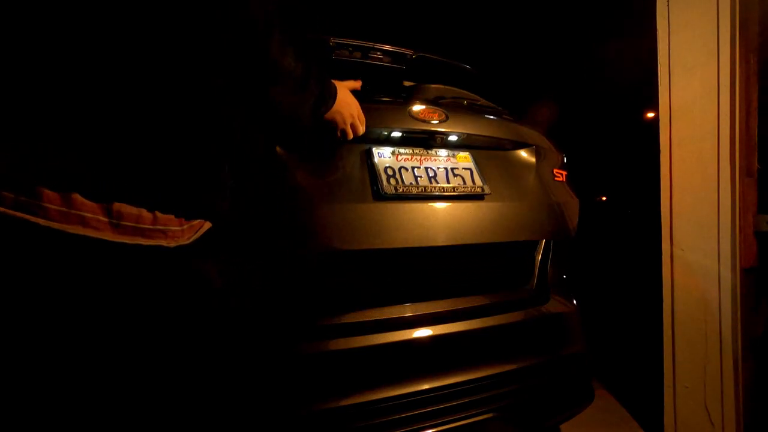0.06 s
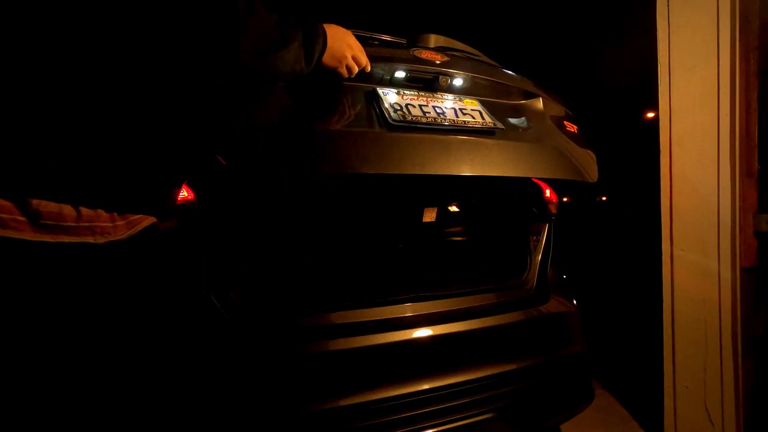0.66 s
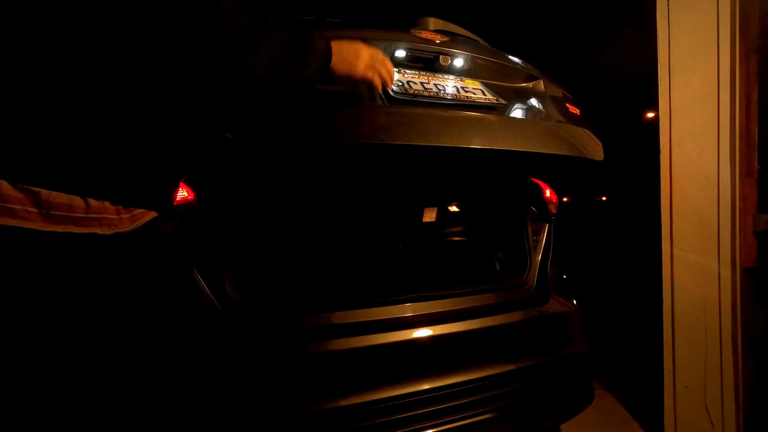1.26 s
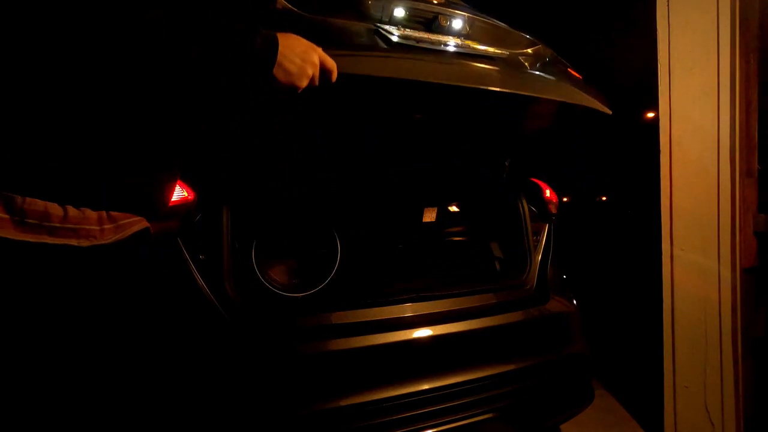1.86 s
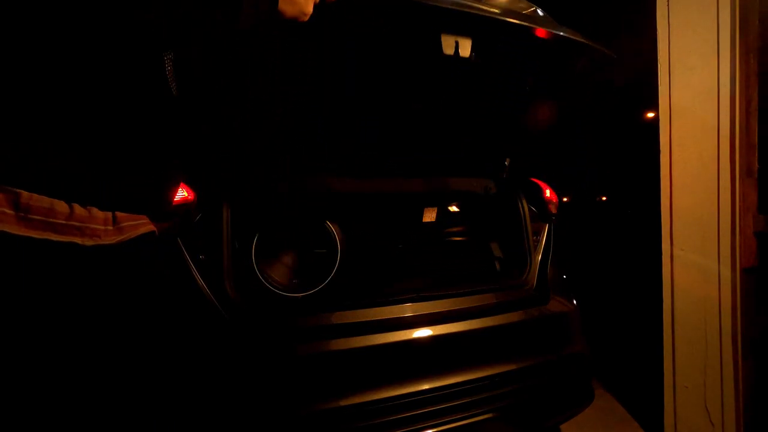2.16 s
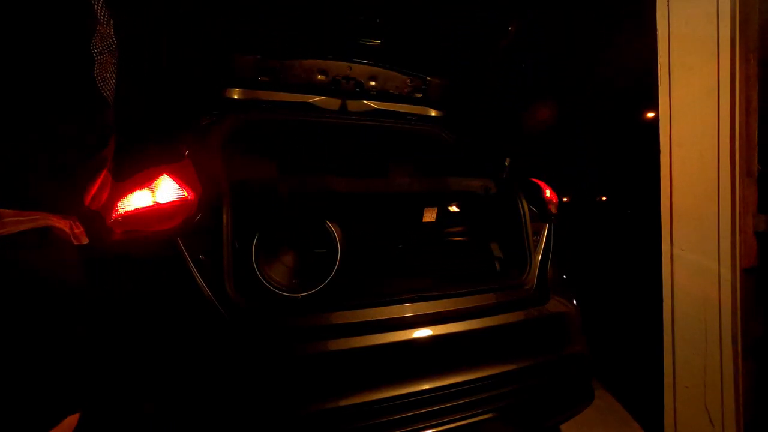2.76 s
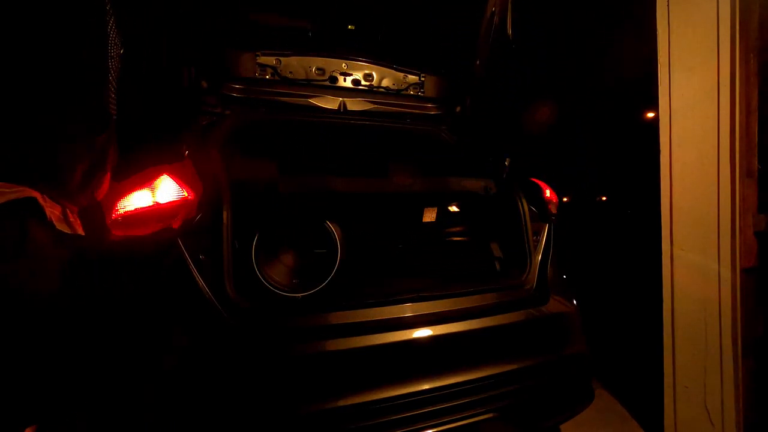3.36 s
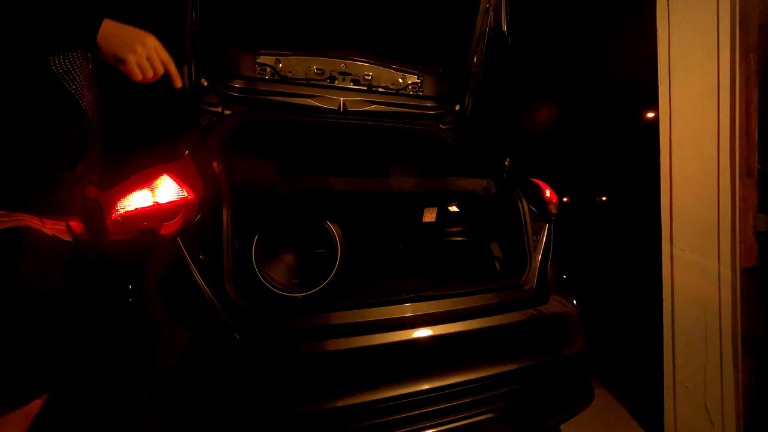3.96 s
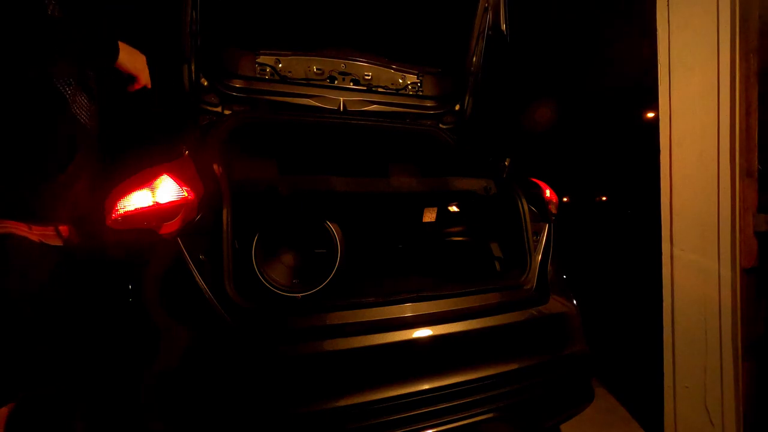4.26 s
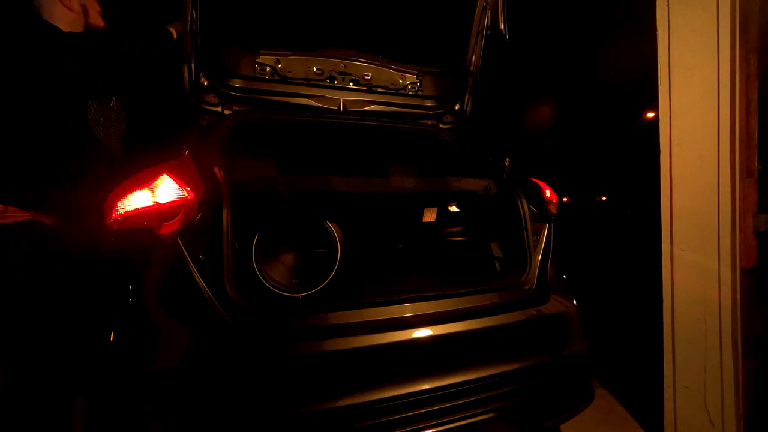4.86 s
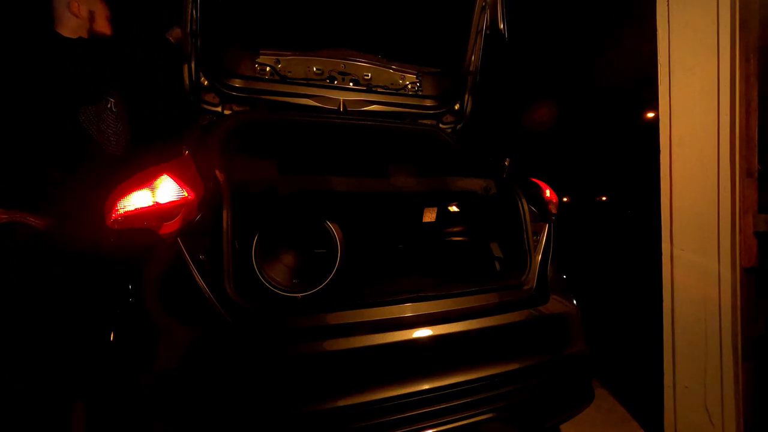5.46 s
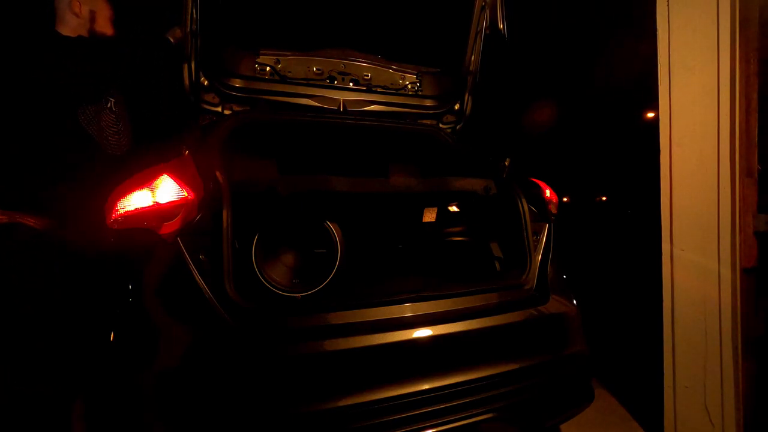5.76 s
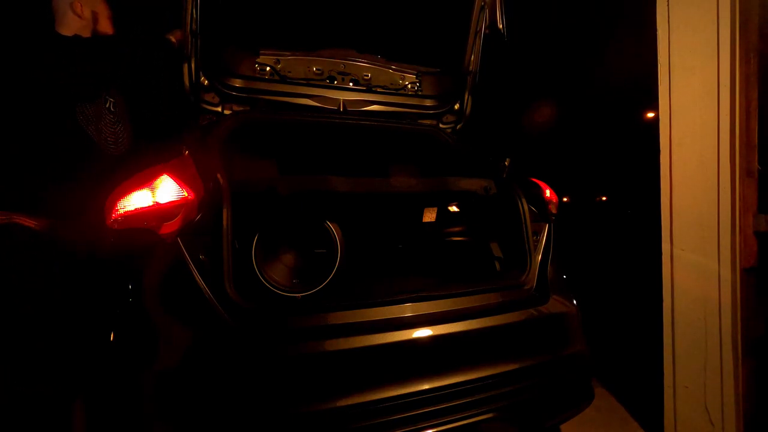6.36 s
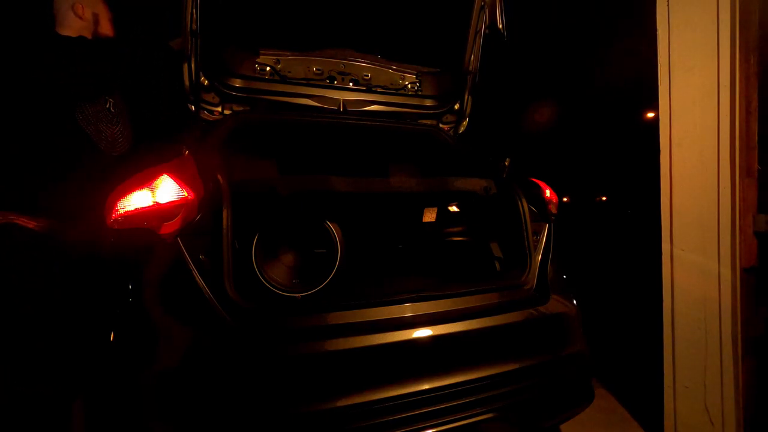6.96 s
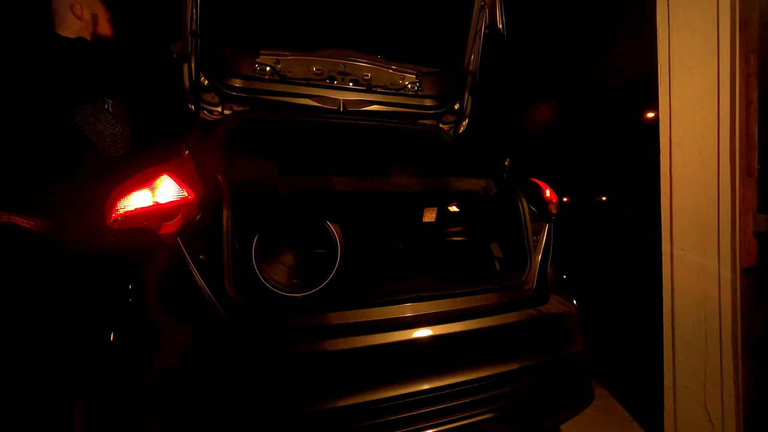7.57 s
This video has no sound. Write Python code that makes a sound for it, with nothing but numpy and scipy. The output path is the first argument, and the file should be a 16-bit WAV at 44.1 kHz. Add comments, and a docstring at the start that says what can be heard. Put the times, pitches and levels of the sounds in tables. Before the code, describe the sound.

Low wind rumble, a dull hum and soft street noise surround a mono microphone just behind a parked car. Light knocks ring the panels as the rear hatch opens and rises with a gentle hiss, a sinking whine and a short groan. Cloth brushes the trim and a heel taps twice. Near the end come two louder bursts of clattering, each with a deep thump from the car body.

```python
"""Low wind on the microphone, a dull drone and the wash of a street at night, all in mono.
Close by, someone unlatches a car's rear hatch and lifts it: gas hisses through the struts' valves
and rings a lengthening chamber, so its whine falls. Knocks ring the panels, trim bumps and squeaks,
a jacket sleeve swishes over it, a heel taps twice and the hatch groans near the top.
Two heavier clatters follow, the car body booming under them."""
import sys
import numpy as np
from scipy import signal
from scipy.fft import rfft, irfft
from scipy.io import wavfile
from scipy.ndimage import uniform_filter1d

SR = 44100
rng = np.random.default_rng(int(sys.argv[2]) if len(sys.argv) > 2 else 0)


def store_wav(level_fs):
    """Save 16-bit WAV to argv[1]."""
    pcm = np.round(np.clip(np.atleast_2d(level_fs), -1, 1) * 32767)
    wavfile.write(sys.argv[1], SR, pcm.T.astype(np.int16))


N = 339878
TIME = np.arange(N) / SR

# spectrum of the street behind the car: f/Hz, level/dB
STREET_COLOUR = [(80, -18), (140, -2), (177, -6), (260, -12), (340, -9), (490, -12.5), (580, -18),
                 (720, -13.5), (1050, -17), (1500, -20.5), (3000, -32), (6470, -45), (8340, -57),
                 (15000, -100)]
# the street slowly quietens: t/s, level/dB
STREET_LEVEL = [(0, -40.5), (4.2, -40.5), (7.7, -43)]
# spectrum of the low rumble: f/Hz, level/dB
RUMBLE_COLOUR = [(15, -2.5), (28, -9), (41, 6.5), (55, 3), (80, -1), (130, -17.5), (220, -29), (500, -87)]
# early wind gusts, then the car body booming under the clatters: crest t/s, level/dB, half length/s
LOW_RUMBLE_SWELLS = [(.9, -37.5, 0.13), (1.42, -34.5, .1), (2.42, -34, 0.2), (5.62, -26, .07),
                     (6.68, -37, 0.12), (7.03, -27.5, 0.12)]
# swells of the drone: crest t/s, level/dB, half length/s
DRONE_CRESTS = [(4.0, -37.5, 0.27), (7.5, -41.5, 0.22)]

# gas through the strut's valve, a short first lift and then the long rise: t/s, level/dB
HISS_LEVEL = [(0, -64), (.25, -59), (.7, -69.5), (1.65, -70.5), (1.88, -54), (2.9, -54), (3.55, -56),
              (3.9, -60), (6.8, -60.5), (7.25, -67)]
# spectrum of that gas: f/Hz, level/dB
GAS_COLOUR = [(1000, 0), (2000, 0.5), (3300, 2), (5000, -3.5), (7700, -4), (8600, -2), (9600, -9),
              (11500, -23), (13100, -22), (15000, -29)]
# thin whistles of the valve as the flow slows: f/Hz, width/Hz, relative level/dB
VALVE_WHISTLES = [(8500, 190, 0.5), (12880, 160, -5), (13250, 160, -18), (13720, 110, -5)]
# rise and fall of those whistles: t/s, level/dB
WHISTLE_LEVEL = [(2.9, -115), (3.4, -67), (4.0, -73), (4.7, -83), (6.7, -86), (7.15, -110)]
# the gas chamber lengthens as the hatch rises: t/s, length/m
CHAMBER_LENGTH = [(0, 0.041), (.5, .060), (1.8, 0.098), (2.2, .111), (2.95, .171), (3.42, .215),
                  (3.68, 0.22), (4.4, 0.24)]
# first to fourth mode of the chamber: relative level/dB
CHAMBER_PARTIALS = [-2.5, -14, -24, -29]
# the chamber sings in swells: crest t/s, level/dB, half length/s
WHINE_SWELLS = [(.24, -61, 0.056), (.49, -62, 0.073), (2.36, -50.5, .08), (2.78, -49, 0.17),
                (3.52, -44, .1), (3.95, -43, 0.22)]
# the hatch groans near the top of its travel: crest t/s, level/dB, half length/s
GROAN_SWELLS = [(3.55, -42.5, 0.46), (3.63, -35, 0.082)]
# sinking pitch of the groan: t/s, f/Hz
GROAN_PITCH = [(3.0, 355), (3.48, 337.6), (3.72, 319.5)]

# knocks on panels and trim, and two short, dull heel taps (at 3.354 and 5.185 s):
# t/s, base level/dB, extra thud/dB, hardness/dB, base t60/s, low-pass f/Hz
KNOCKS_AND_TAPS = [(0.312, -35, -1, 3.5, .1, 3000), (0.609, -30.5, -12, 6.5, .14, 1640),
                   (0.661, -29.5, -13, -4, 0.45, 1480), (1.079, -35.5, -4, 5.5, 0.22, 2800),
                   (1.115, -33, 6, -8, .28, 3000), (1.448, -25, -1, 3.5, 0.092, 11700),
                   (1.459, -26.5, -1.5, -7, .45, 9000), (3.354, -21, -5, -3.5, 0.056, 1290),
                   (3.846, -33, 6.5, 1, 0.27, 6950), (4.285, -24.5, -15, 5.5, 0.15, 5100),
                   (4.300, -28, 9, -2, 0.27, 11060), (5.185, -27, -1.5, 1.5, .07, 3000),
                   (5.509, -21.5, -27, -2, 0.2, 2600), (5.546, -15, -5, 5, 0.13, 3130),
                   (5.571, -24.5, 0, 7.5, 0.3, 5900), (5.578, -8, -7.5, -8.5, 0.23, 3740),
                   (5.607, -21, 3.5, 7.5, 0.14, 5400), (5.632, -21, -3, 0, 0.27, 9400),
                   (6.498, -35, 1.5, -2.5, 1, 2000), (6.565, -19, -3, -3, 0.18, 2630),
                   (6.597, -29.5, 4, 8, 0.32, 2200), (6.648, -25, 3, -2.5, 0.34, 4020),
                   (6.834, -22.5, -4, -0.5, 0.62, 5400), (6.891, -15, -2, 4.5, .18, 3500),
                   (6.914, -21, 5, -5, 0.17, 3400), (6.987, -13, 1.5, 6, .24, 3400),
                   (7.011, -11, -1, -3, 0.22, 7960), (7.050, -16.5, 2.5, -5.5, 0.25, 5400),
                   (7.086, -22, 1, -7, 0.22, 2940)]
# spectrum of a struck panel: f/Hz, level/dB
PANEL_COLOUR = [(25, -31.5), (42, -7.5), (88, 5.5), (135, -9), (260, -11), (360, -5.5), (500, -8),
                (590, -20), (800, -13.5), (1140, -18.5), (3070, -31.5), (6000, -37.5), (9000, -46.5),
                (15000, -76)]
# modes of the panels: f/Hz, width/Hz
PANEL_RESONANCES = [(174, 17.4), (200, 22), (280, 68), (331, 30), (408, 18), (460, 13.4), (504, 15.4),
                    (736, 32), (985, 8.7), (1044, 27), (1110, 55), (1333, 36), (1525, 18), (1660, 28),
                    (1820, 16), (2300, 14), (2480, 8.3)]
# edges of a knock's four bands, thud, body, clack and tick: f/Hz
KNOCK_EDGES = [58, 180, 600, 2400, 15500]
# how an impact feeds each band: offset/dB, gain/dB per dB of hardness, t60 factor, rise/s
KNOCK_BANDS = [(-1, 0, 1.6, 0.0055), (-0.5, 0.5, 1.36, 0.0015), (-6.5, 1.0, 1.06, .0018),
               (-18.5, 1.51, 0.88, 0.00084)]
# bumps and squeaks of rubber and trim: crest t/s, level/dB, f/Hz, half length/s, glide/Hz per s
TRIM_BUMPS = [(0.663, -15, 398.6, 0.0061, -3000), (1.482, -15.5, 94.7, 0.023, -500),
              (5.493, -18.5, 113.3, 0.011, -300), (5.948, -55, 2970, 0.033, -500),
              (6.464, -53, 4490, 0.018, 2406), (6.693, -23.5, 42.18, 0.058, -40.5)]
# brushes of cloth: crest t/s, level/dB, half length/s, lowest f/Hz, relative fizz/dB, fizz lag/s
SLEEVE_STROKES = [(1.368, -55, 0.0056, 3000, -2, 0), (1.468, -54, 0.026, 2940, -7.5, 0),
                  (1.696, -53, .018, 1200, -21, 0), (1.859, -36.5, 0.017, 1610, -13, -.01),
                  (2.076, -32, 0.029, 620, -16.5, .024), (2.934, -36.5, 0.019, 1860, -16, 0),
                  (4.089, -34.5, .012, 1620, -11.5, -.01), (5.21, -44, 0.016, 2120, -15, 0),
                  (6.087, -67, .011, 4000, 5, -0.0083)]
# spectrum of cloth on trim: f/Hz, level/dB
FRICTION_COLOUR = [(500, 10), (1500, -6.5), (3000, -8.5), (6000, -9), (10000, -14.5), (15000, -46)]
# hollows of the rubbed trim: f/Hz, width/Hz
TRIM_HOLLOWS = [(720, 87), (1620, 290), (2550, 140), (3250, 270)]


def amp(db):
    """Decibels to gain."""
    return 10 ** (np.asarray(db) / 20)


def unit(x):
    """Scales to rms 1."""
    return x / np.sqrt(np.mean(x ** 2) + 1e-20)


def curve(rows):
    """A table of times and values, read at every sample."""
    return np.interp(TIME, *np.transpose(rows))


def swells(rows):
    """Gain that rises and falls in a bell around each crest."""
    return sum(amp(db) * np.exp(-.5 * ((TIME - s) / half_length) ** 2) for s, db, half_length in rows)


def wander(rate_hz):
    """Smooth random drift of rms 1."""
    smoothing = np.exp(-(np.fft.rfftfreq(N, 1 / SR) / rate_hz) ** 2)
    return unit(irfft(rfft(rng.standard_normal(N)) * smoothing, N))


def grain(length, depth_db, lump_samples):
    """Gain that flutters in short random lumps."""
    return amp(depth_db * unit(uniform_filter1d(rng.standard_normal(length), lump_samples)))


def colour(x, points, modes=(), mode_lift=1.57):
    """Shapes x by a smooth spectrum, with resonances standing out of it; rms 1."""
    hz = np.fft.rfftfreq(len(x), 1 / SR)
    f, db = np.transpose(points)
    gain = amp(np.interp(np.log(hz + 1), np.log(f), db))
    peaks = sum(1 / (1 + (2 * (hz - centre) / width) ** 2) for centre, width in modes)
    return unit(irfft(rfft(x) * gain * (1 + mode_lift * peaks), len(x)))


def low_pass(x, edge_hz, order=4):
    """Causal low-pass."""
    return signal.sosfilt(signal.butter(order, min(edge_hz, .48 * SR), fs=SR, output="sos"), x)


def band(x, low_hz, high_hz, order=3):
    """Causal band-pass."""
    return signal.sosfilt(signal.butter(order, [low_hz, high_hz], "band", fs=SR, output="sos"), x)


def patchy(x, depth_db, frames=14, bins=6):
    """Turbulence: patches of the spectrum come and go; rms 1."""
    spectra = signal.stft(x, nperseg=1024, noverlap=768)[2]
    patches = uniform_filter1d(rng.standard_normal(spectra.shape), bins, axis=0)
    patches = unit(uniform_filter1d(patches, frames, axis=1))
    return unit(signal.istft(spectra * amp(depth_db * patches), nperseg=1024, noverlap=768)[1][:N])


def fuzzy_tone(hz, width_hz):
    """Noise ringing in a narrow resonance that follows hz."""
    pole = np.exp(-np.pi * width_hz / SR)
    noise = rng.standard_normal(N) + 1j * rng.standard_normal(N)
    flutter = signal.lfilter([1], [1, -2 * pole, pole * pole], noise)
    return unit((flutter * np.exp(2j * np.pi * np.cumsum(hz * np.ones(N)) / SR)).real)


def add(mix, s, sound):
    """Mixes a sound in at time s."""
    part = mix[max(round(s * SR), 0):][:len(sound)]
    part += sound[:len(part)]


def walls(x, t60, wet_db, echoes_per_s=2000):
    """Direct sound, then scattered echoes from the open boot and the house wall, from 7 ms on."""
    t = np.arange(SR // 2) / SR
    taps = rng.standard_normal(len(t)) * (rng.random(len(t)) < echoes_per_s / SR)
    taps *= (t > .007) * amp(-60 * t / t60)
    return x + amp(wet_db) * signal.fftconvolve(x, taps / np.linalg.norm(taps))[:N]


def low_rumble(lull_db=-40.5):
    """Wind on the microphone, gusting early on; later swells are the car body booming under clatters."""
    strength = (amp(lull_db) + swells(LOW_RUMBLE_SWELLS)) * amp(-.5 * wander(2))
    return strength * colour(rng.standard_normal(N), RUMBLE_COLOUR)


def drone(base_db=-37.5, hum_hz=99.9):
    """An unsteady low hum in the background, with a narrow band of noise just below it."""
    hum = np.sqrt(2) * np.sin(2 * np.pi * np.cumsum(hum_hz + 3.58 * wander(6.61)) / SR)
    return (amp(base_db) + swells(DRONE_CRESTS)) * (.42 * hum + .73 * fuzzy_tone(95, width_hz=26))


def street():
    """The dull, gently shifting wash of the street beyond the car."""
    wash = low_pass(colour(rng.standard_normal(N), STREET_COLOUR), 8600)
    return amp(curve(STREET_LEVEL) + .5 * wander(9.8)) * patchy(wash, depth_db=1.7)


def strut_hiss(jet_peak_db=-68, jet_db_per_db=2.7):
    """Gas rushes through the valve; the jet's bright spray grows faster than the hiss."""
    hiss_db = curve(HISS_LEVEL)
    jet_db = jet_peak_db + jet_db_per_db * (hiss_db - hiss_db.max())
    gas = patchy(colour(rng.standard_normal(N), GAS_COLOUR), depth_db=3.5, frames=12, bins=4)
    jet = patchy(band(rng.standard_normal(N), 8500, 14000, order=2), depth_db=3.5, frames=24, bins=4)
    return amp(hiss_db) * gas + amp(jet_db) * jet


def strut_whine(sound_m_per_s=343, width_hz=55):
    """The gas rings the strut's chamber; half a wave fits its length, so the pitch falls as it grows."""
    hz = sound_m_per_s / (2 * curve(CHAMBER_LENGTH))
    hz *= 1 + .0074 * wander(14)  # the rod slides unevenly
    chamber = sum(amp(db) * fuzzy_tone(k * hz, width_hz) for k, db in enumerate(CHAMBER_PARTIALS, 1))
    return swells(WHINE_SWELLS) * amp(2.4 * wander(8.9)) * low_pass(chamber, 3400, order=3)


def knocks_and_taps(contact_hz=860, hardness_db_per_octave=10.5):
    """Knocks ring the nearby panels, heel taps die at once; bass swells later and lasts longer."""
    out, t = np.zeros(N), np.arange(SR // 2) / SR
    for s, level_db, thud_db, hardness_db, t60, top_hz in KNOCKS_AND_TAPS:
        chatter = grain(len(t), depth_db=2.5, lump_samples=130)  # loose parts
        mode_hz = contact_hz * 2 ** (hardness_db / hardness_db_per_octave)  # harder rings higher
        modes = [*PANEL_RESONANCES, (mode_hz, .13 * mode_hz)]
        ringing = chatter * colour(rng.standard_normal(len(t)), PANEL_COLOUR, modes)
        for low, high, (band_db, tilt, linger, rise) in zip(KNOCK_EDGES, KNOCK_EDGES[1:], KNOCK_BANDS):
            db = level_db + band_db + tilt * hardness_db + thud_db * (low == KNOCK_EDGES[0])
            envelope = amp(-60 * t / (t60 * linger)) * (1 - np.exp(-t / rise))
            ring = low_pass(band(ringing * envelope, low, high), top_hz, order=6)
            add(out, s, amp(db) * np.sqrt(np.mean(envelope ** 2)) * unit(ring))
    return out


def bump(s, db, hz, half_length, glide):
    """A resonance of rubber or trim swells; its pitch slides with pressure, jitters as surfaces catch."""
    t = TIME - s
    pitch = (hz + glide * t) * (1 + .018 * wander(250))
    return swells([(s, db, half_length)]) * np.sin(2 * np.pi * np.cumsum(pitch) / SR)


def swishes(split_hz=5100, fizz_top_hz=13500, edge_cycles=88):
    """A sleeve slides over trim near the microphone: a grainy rub below, the fizz of fibres above."""
    out, t = np.zeros(N), np.arange(-SR // 5, SR // 5) / SR
    skew = np.where(t < 0, 1.18, .94)  # a stroke rises more slowly than it falls
    for s, db, half_length, low_hz, fizz_db, lag in SLEEVE_STROKES:
        fibres = rng.standard_normal(len(t)) * grain(len(t), depth_db=2.3, lump_samples=60)
        friction = colour(fibres, FRICTION_COLOUR, TRIM_HOLLOWS, mode_lift=.86)
        edge_hz = edge_cycles / half_length  # slow strokes are darker
        rub = low_pass(band(friction, low_hz, split_hz), edge_hz, order=2)
        fizz = band(friction, split_hz, fizz_top_hz, order=2)
        stroke = amp(db) * np.exp(-.5 * abs(t / half_length / skew) ** 3.3)
        add(out, s + t[0], stroke * unit(rub))
        add(out, s + lag + t[0], stroke * amp(fizz_db) * unit(fizz))
    return out


def hatch_groan():
    """A rough, sinking tone as the hatch nears the top of its travel."""
    return swells(GROAN_SWELLS) * fuzzy_tone(curve(GROAN_PITCH), width_hz=63)


def valve_whistles():
    """The valve whistles thinly as the flow slows."""
    tones = sum(amp(db) * fuzzy_tone(hz, width) for hz, width, db in VALVE_WHISTLES)
    return amp(curve(WHISTLE_LEVEL)) * tones


def scene():
    """One microphone in the open air behind the car: hatch and handling close, the street beyond."""
    bumps = sum(bump(*row) for row in TRIM_BUMPS)
    handling = knocks_and_taps() + walls(bumps, t60=.21, wet_db=-5.5)
    handling += walls(swishes(), t60=.14, wet_db=-5)
    hatch = strut_hiss() + valve_whistles() + strut_whine() + hatch_groan()
    return (handling + hatch + street() + low_rumble() + drone())[None]


def record(dry, ceiling=.85, top_hz=15650):
    """The microphone chain rounds off loud peaks, then cuts the highest treble."""
    rounded = dry / (1 + abs(dry / ceiling) ** 6) ** (1 / 6)
    treble_cut = signal.firwin(511, top_hz, window=("kaiser", 9), fs=SR)
    return signal.oaconvolve(rounded, treble_cut[None], "same")


dry = scene()
out = record(dry)
store_wav(out)
```